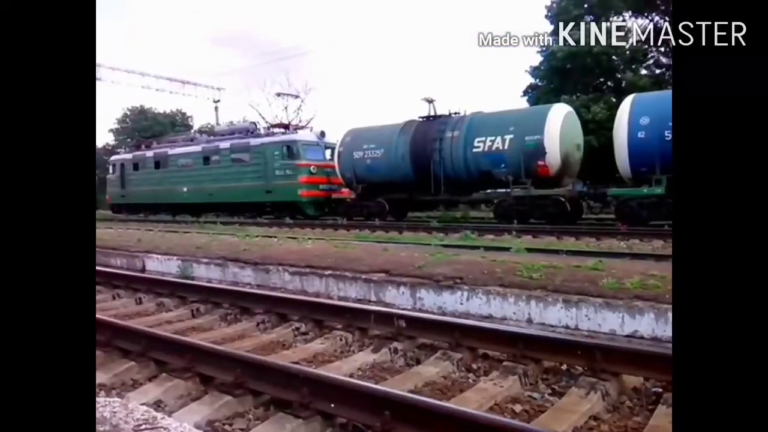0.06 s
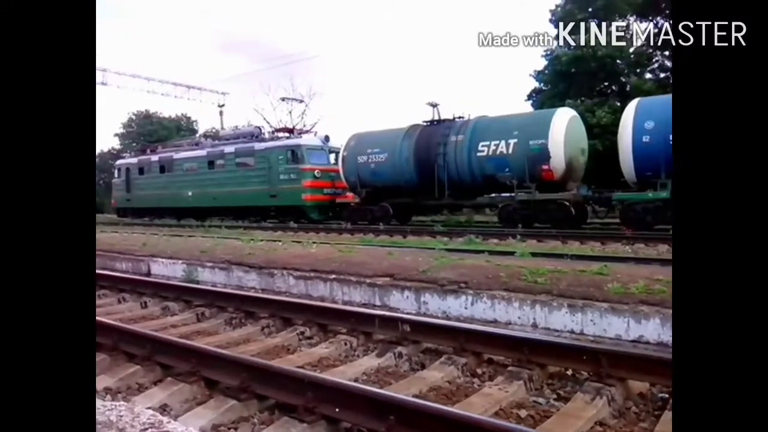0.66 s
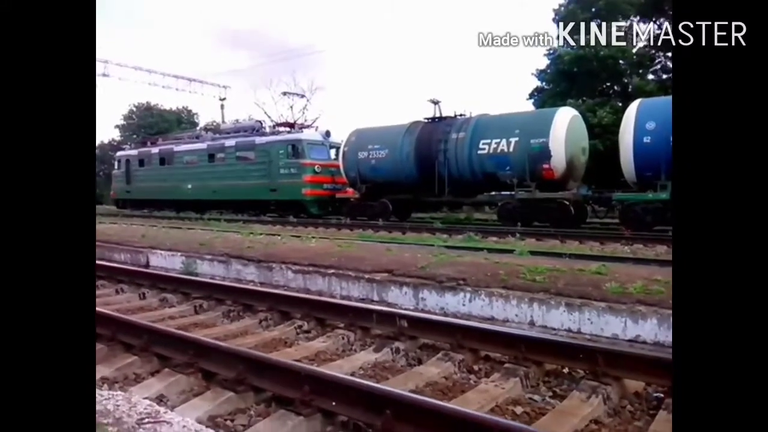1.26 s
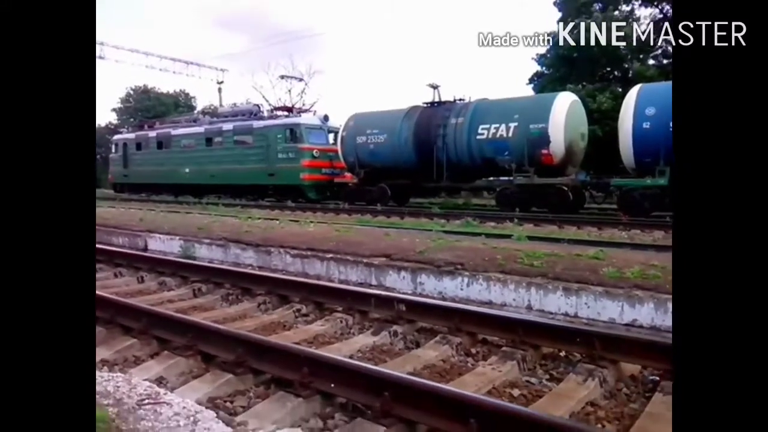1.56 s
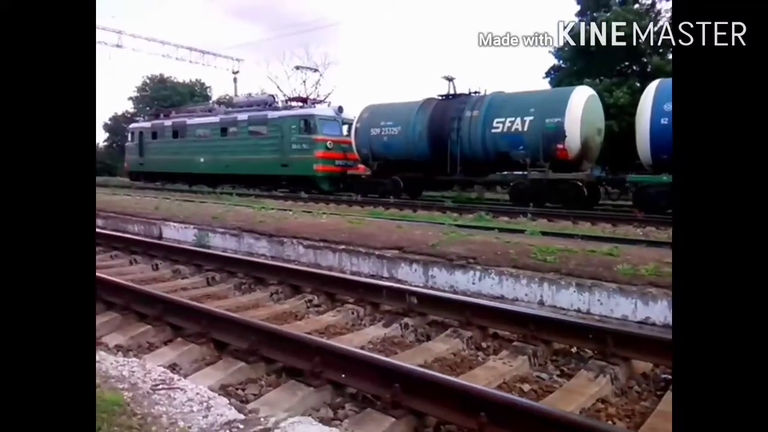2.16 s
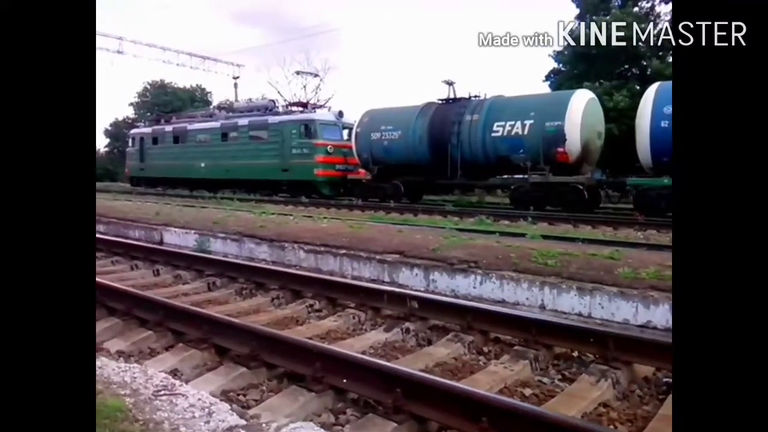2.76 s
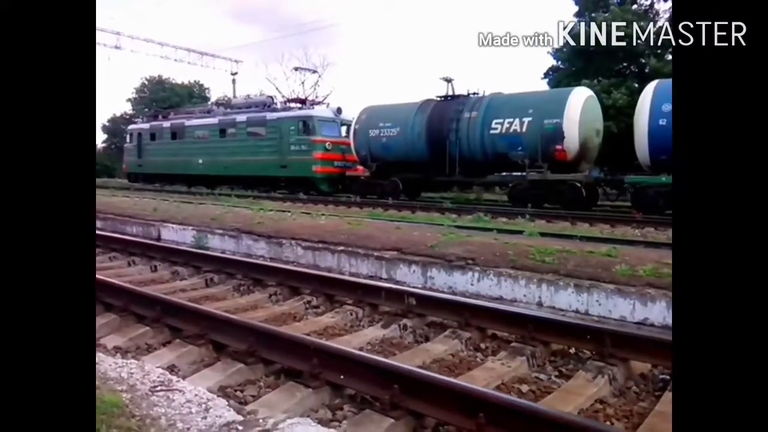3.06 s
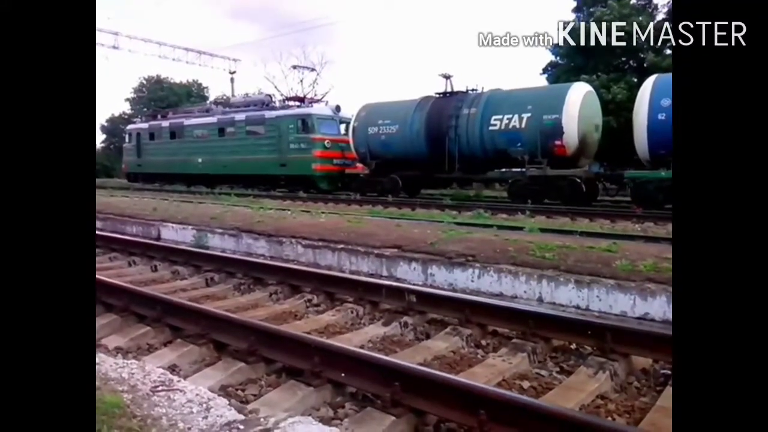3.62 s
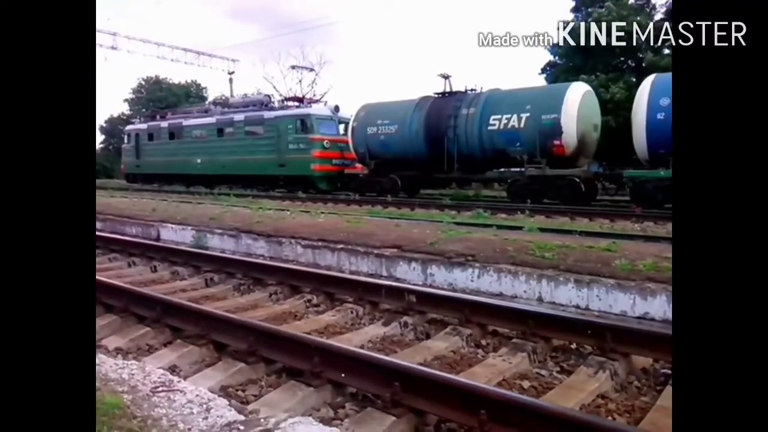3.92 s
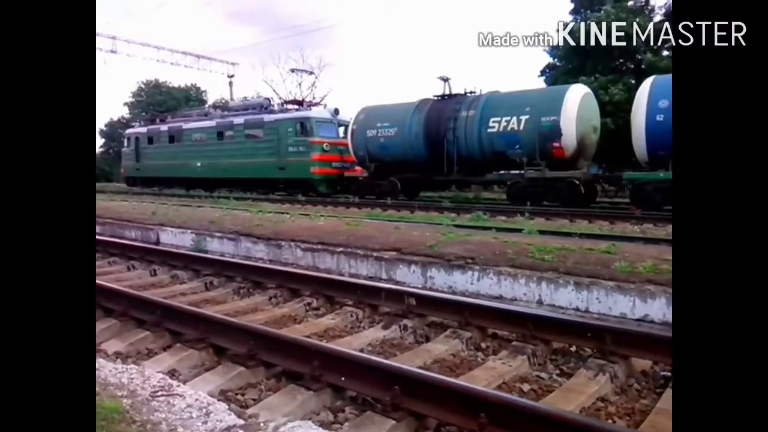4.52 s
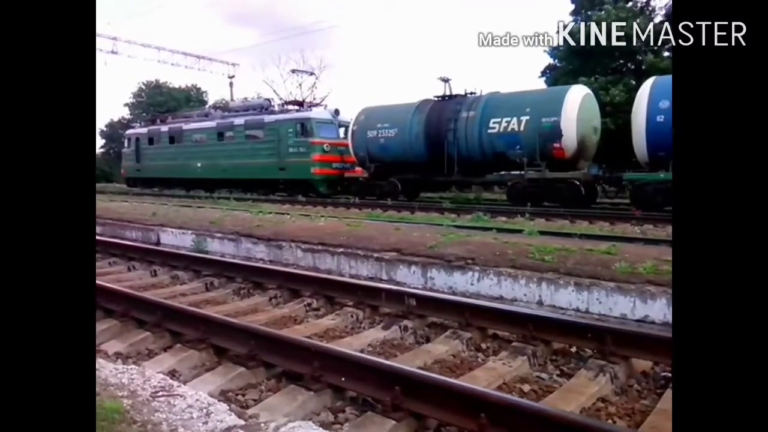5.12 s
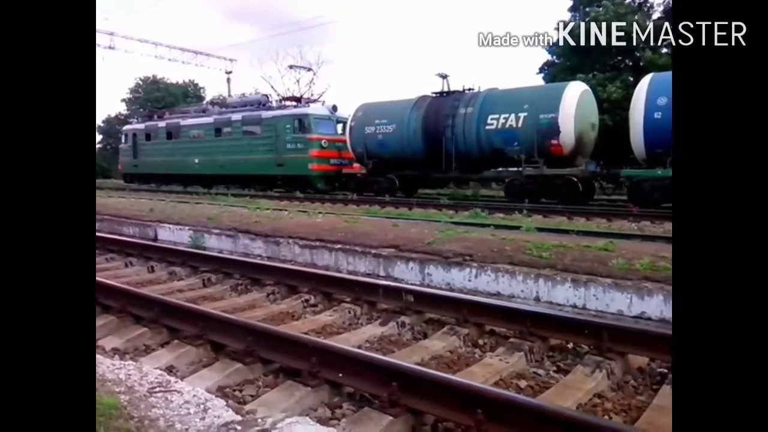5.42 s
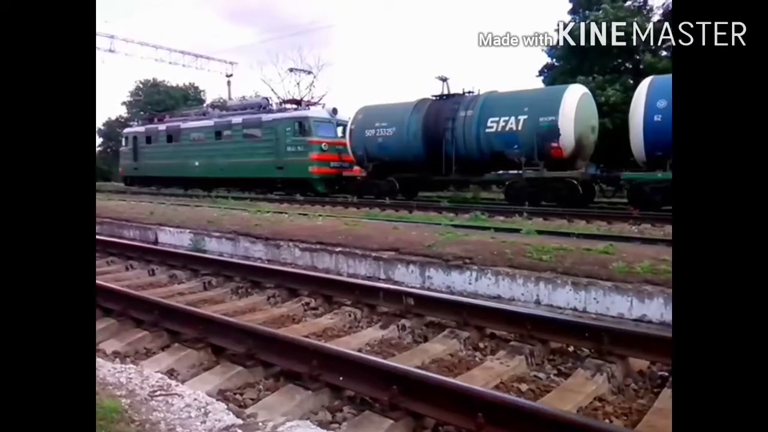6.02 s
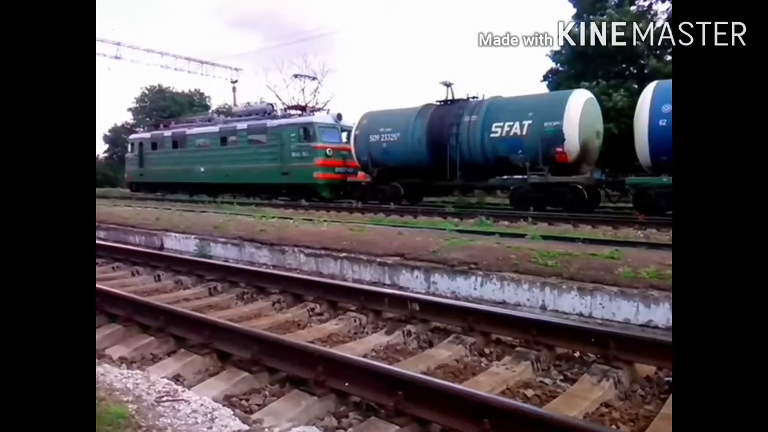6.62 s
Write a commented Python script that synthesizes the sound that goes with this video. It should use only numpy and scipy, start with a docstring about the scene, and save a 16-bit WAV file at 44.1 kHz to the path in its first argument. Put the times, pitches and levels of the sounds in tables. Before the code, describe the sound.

A short blast of released air dies away as an electric locomotive stands in a rail yard. A thin, high, sizzling motor whine rises slightly in pitch, then swells and fades over rushing cooling air, a soft compressor throb, light metallic chatter and a continuous hiss. Faint squeaks and groans come from the machinery. Wind hits the bare microphone in irregular low thumps and a few sharp slaps.

```python
"""A blast of released air dies away as an electric locomotive, standing in a rail yard, spins a motor
up to a thin, sizzling whine. Cooling air churns through the louvres, a compressor's two pistons throb
in their intake pipe, and the machine room chatters, with faint groans and squeaks. A thin hiss of air
carries on throughout, while eddies of wind thump and slap on the bare microphone."""
import sys
import numpy as np
from scipy import signal
from scipy.fft import rfft, irfft
from scipy.io import wavfile
from scipy.ndimage import uniform_filter1d, map_coordinates

SR = 44100
rng = np.random.default_rng(int(sys.argv[2]) if len(sys.argv) > 2 else 0)


def transcribe(u):
    """Save the signal u as a 16-bit wav file named by the first command-line argument.

    u: samples, shape (n,) or (channels, n), limited to [-1, 1]; the rate is SR.
    q: integer samples, one column per channel.
    """
    v = np.clip(np.atleast_2d(u).T, -1, 1)
    q = np.round(v * 32767).astype(np.int16)
    wavfile.write(sys.argv[1], SR, q)


N = 298998
TIME = np.arange(N) / SR
BINS = np.fft.rfftfreq(N, 1 / SR)


# Bright colour of the released air: freq_hz, gain_db
BLAST_EQ = [(200, -52), (550, -16.5), (750, -6.5), (1250, -2.5), (1900, 0.5), (2400, -5.5), (2750, -2),
            (3300, -13), (4300, -13), (5300, 3), (6100, -1), (7300, -8), (8000, -42.5), (8550, -32),
            (9300, -51.5)]
def air_blast(level_db=-19, shut_s=.16, fall_db_per_s=60):
    """A valve blows off air, then shuts, and the blast dies away."""
    return amp(level_db - fall_db_per_s * np.maximum(TIME - shut_s, 0)) * noise(BLAST_EQ)


# Fader ride of the whine: time_s, level_db
WHINE_RIDE = [(.38, -27.5), (.59, -48), (.76, -30), (.95, -23), (1.21, -28), (1.34, -36), (1.64, -35),
              (2.25, -41.5), (2.46, -48), (3.2, -27.5), (3.85, -41.5), (4.29, -45.5), (4.51, -32.5),
              (4.64, -42), (4.75, -30), (5.35, -34.5), (5.85, -45.5), (6.78, -44)]
# Resonances that sizzle around the whine: pitch_hz, width_hz, gain_db
SIZZLE_MODES = [(4925, 85, 4), (5058, 91, 3), (5230, 250, 4), (5540, 420, 6.5)]
def motor(full_hz=5265, climb_hz=155, spin_up_s=.7, jitter_hz=3, fade_in_s=.41, whine_share=.47):
    """The motor whines up to full speed; its sizzle follows both the whine and the hiss of air."""
    pitch_hz = full_hz - climb_hz * np.exp(-TIME / spin_up_s) + jitter_hz * drift(21)
    phase = 2 * np.pi * np.cumsum(pitch_hz) / SR
    # scattered paths add to the direct one with shifting strength and phase
    tone = unit((1 + .3 * drift(60)) * np.sin(phase) + .3 * drift(60) * np.cos(phase))
    whine_gain = level(WHINE_RIDE) * np.minimum(TIME / fade_in_s, 1) ** 2
    sizzle_gain = whine_gain ** whine_share * level(HISS_RIDE) ** (1 - whine_share)
    return amp(2) * whine_gain * tone + sizzle_gain * ringing(SIZZLE_MODES)


# Broad colour of air through the louvres: freq_hz, gain_db
LOUVRE_EQ = [(20, -56.5), (55, -35.5), (95, -3), (200, -1), (380, -6), (600, -8), (730, -2), (900, -8.5),
             (1100, -0.5), (1600, -0.5), (2150, -0.5), (2300, -5.5), (2850, -3.5), (3200, -23), (4200, -38),
             (5500, -28), (9000, -46)]
# Fader ride of the cooling air: time_s, level_db
COOLING_RIDE = [(0, -37.5), (0.58, -36), (2.81, -38), (3.57, -35), (5.17, -39.5), (5.8, -39), (6.78, -37.5)]
# Resonances of the machine room: pitch_hz, width_hz, gain_db
ROOM_MODES = [(1085, 17, -7), (1322, 64, -5), (1535, 51, -1.5), (1625, 22, -6.5), (1735, 75, -1),
              (2026, 25, -6), (2149, 38, -2)]
def cooling_air(rush_db=.5, room_db=-2, churn_db=3.5):
    """Fan air rushes through the louvres and stirs the room's resonances, each in its own surges."""
    room = unit(sum(amp(db + churn_db * drift(19)) * ringing([(hz, width, 0)])
                    for hz, width, db in ROOM_MODES))
    rush = amp(rush_db) * noise(LOUVRE_EQ)
    churn = amp(room_db) * wobble(room, depth=.003, rate_hz=7.83)
    return level(COOLING_RIDE) * (rush + churn)


def compressor(pipe_hz=278.5, turn_s=.283, first_stroke_s=.235, sharpness=4.5):
    """Two pistons, one strong and one weak, take turns at sounding the intake pipe."""
    crank = np.cos(2 * np.pi * (TIME - first_stroke_s) / turn_s)
    strong = np.exp(sharpness * (crank - 1))
    weak = amp(-10) * np.exp(-sharpness * (crank + 1))
    pipe = unit(np.sin(2 * np.pi * (pipe_hz * TIME + .094 * drift(14))))
    uneven_gain = amp(-38 + 2 * drift(6))
    return uneven_gain * (strong + weak + amp(-17)) * pipe  # the pipe hums on between strokes


# Fader ride of the hiss: time_s, level_db
HISS_RIDE = [(0.4, -39), (1.0, -36.5), (1.5, -42), (2.35, -35), (2.58, -40.5), (3.3, -34), (5.2, -46.5),
             (6.78, -40.5)]
# Thin colour of the hiss: freq_hz, gain_db
HISS_EQ = [(3000, -7), (4200, -7.5), (4600, 1), (5300, 0), (5800, 3.5), (6300, 1.5), (6750, 2),
           (7300, -0.5), (7650, -22.5), (8000, -44), (8600, -23.5), (9200, -39.5)]
def air_hiss(trim_db=1.03, flutter_db=.7):
    """Air hisses on with a slight flutter."""
    return amp(trim_db + flutter_db * drift(12)) * level(HISS_RIDE) * noise(HISS_EQ)


# Swell of the spurt: peak_s, level_db, half_length_s
SPURT_SWELL = [(3.245, -32, -0.01)]
# Resonance of the spurt: pitch_hz, width_hz, gain_db
SPURT_MODE = [(6620, 630, 0)]
def air_spurt():
    """One short, high spurt of air."""
    return swells(SPURT_SWELL) * ringing(SPURT_MODE)


# Close, metallic resonances: pitch_hz, width_hz, gain_db
CHATTER_MODES = [(1860, 71, 2.5), (1922, 42, 3.5), (2040, 100, -7)]
# Accents in the rattle: peak_s, level_db
CHATTER_ACCENTS = [(.28, -24.5), (.47, -32.5), (2.41, -32.5), (3.061, -27), (3.29, -28), (6.64, -32)]
def chatter(idle_db=-41.5, uneven_db=4.5, half_length_s=.051):
    """A restless rattle, with a few harder bursts, stirs resonances that bend in pitch."""
    rattle = amp(idle_db + uneven_db * np.tanh(drift(11)))
    bursts = amp(-2) * swells([(s, db, half_length_s) for s, db in CHATTER_ACCENTS])
    return np.hypot(rattle, bursts) * wobble(ringing(CHATTER_MODES), depth=.0051, rate_hz=10.26)


# Single strong eddies: peak_s, level_db, half_length_s
WIND_THUMPS = [(1.002, -18.5, 0.0074), (1.075, -22.5, .025), (1.342, -12.5, 0.013), (1.597, -12.5, 0.0062),
               (1.634, -15, .015), (1.975, -13, .026), (2.126, -19, 0.024), (2.248, -29, 0.012),
               (2.406, -16.5, 0.0067), (2.491, -18, 0.029), (2.529, -7.5, 0.0084), (2.665, -15, 0.0092),
               (2.847, -15, 0.011), (3.007, -21, 0.0078), (3.083, -21.5, .019), (3.262, -19, .031),
               (3.303, -16, 0.031), (3.566, -30, 0.013), (4.348, -17.5, 0.022), (4.85, -11.5, 0.017),
               (5.052, -12.5, .022), (5.55, -21, .02), (5.902, -19.5, 0.014), (6.123, -19.5, 0.021),
               (6.213, -22, 0.0078), (6.294, -17.5, 0.013), (6.751, -16.5, 0.014)]
# Dull colour of soft wind: freq_hz, gain_db
SOFT_WIND_EQ = [(20, -19), (60, -27), (85, -8), (120, 2.5), (165, 3.5), (280, -3), (400, -21.5),
                (560, -43.5), (900, -50.5), (2000, -88.5)]
# Brighter colour of hard wind: freq_hz, gain_db
HARD_WIND_EQ = [(20, -22), (60, -23), (85, -16.5), (120, -4.5), (165, 4), (280, -2.5), (400, -8.5),
                (520, -12.5), (750, -26), (1100, -40), (2500, -86)]
def wind(soft_db=-26, hard_db=-13, lumps_db=10):
    """Each eddy pushes a few uneven cycles of pressure into the microphone; harder ones are brighter."""
    force = np.hypot(gusts(), swells(WIND_THUMPS, lean=.07))
    hardness = np.clip((20 * np.log10(force) - soft_db) / (hard_db - soft_db), 0, 1)
    # turbulence comes in lumps, so the thumps sputter
    swirl = rng.standard_normal(N) * amp(lumps_db * np.tanh(drift(110)))
    pressure = (1 - hardness) * colour(swirl, SOFT_WIND_EQ) + hardness * colour(swirl, HARD_WIND_EQ)
    # compress the swirl, so the eddy sets how hard the thump is
    local_rms = np.sqrt(uniform_filter1d(uniform_filter1d(pressure ** 2, size=750), size=500))
    return amp(.5) * force * unit(pressure / local_rms ** .85)


# Gusts, each a crowd of small eddies: start_s, length_s, level_db, uneven_db
GUST_CUES = [(0.655, 0.047, -29, 3), (0.879, 0.23, -34, 5.5), (1.217, 0.12, -29, 4.5),
             (1.555, 0.15, -17.5, 4), (1.734, .17, -24, 3), (1.94, .92, -28, 3), (4.72, 0.22, -18.5, 1.5),
             (4.83, 0.39, -14, -1), (5.505, .65, -35.5, 6)]
def gusts(rise_s=.014, fall_s=.028, eddy_hz=24.6):
    """Gain of gusts that rise, hold and fall away, while their small eddies come at random."""
    eddies = np.clip(drift(eddy_hz), -2, 1.5)
    power = np.zeros(N)
    for start, length, db, uneven_db in GUST_CUES:
        before = np.maximum(start - TIME, 0) / rise_s
        after = np.maximum(TIME - start - length, 0) / fall_s
        power += (amp(db + uneven_db * eddies) * np.exp(-before - after)) ** 2
    return np.sqrt(power)


# Slaps of the sharpest eddies: centre_s, level_db, pitch_hz, half_length_cycles
SLAP_HITS = [(1.331, -1.5, 366, 0.65), (1.639, -6.5, 792, 1.2), (2.531, -20, 316, 0.38),
             (6.114, -16, 450, 1.4)]
def wind_slaps():
    """A sharp eddy is a quick push and pull on the diaphragm."""
    out = np.zeros(N)
    for s, db, hz, half_length in SLAP_HITS:
        cycles = (TIME - s) * hz
        out -= amp(db) * np.sin(2 * np.pi * cycles) * np.exp(-(cycles / half_length) ** 2)
    return out


# Faint metallic squeaks: peak_s, level_db
SQUEAK_CUES = [(0.64, -38.5), (2.791, -39.5), (2.94, -44), (3.38, -39.5)]
def squeaks(pitch_hz=2705, width_hz=70, half_length_s=.032):
    """A narrow resonance sings out briefly now and then."""
    return swells([(s, db, half_length_s) for s, db in SQUEAK_CUES]) * ringing([(pitch_hz, width_hz, 0)])


# Faint groans: peak_s, level_db, half_length_s
GROAN_CUES = [(3.89, -49, .03), (4.23, -42, .055), (4.49, -46, .025)]
# Hollow body of the groans: pitch_hz, width_hz, gain_db
GROAN_MODES = [(720, 57, -4), (760, 130, 14.5)]
def groans():
    """A hollow resonance swells now and then."""
    return swells(GROAN_CUES) * ringing(GROAN_MODES)


def yard_echoes(x, count=8, gain=.17, latest_s=.03):
    """Echoes off the ground and the wagons comb the noise with fine ripples."""
    delays = (rng.uniform(.1, 1, count) * latest_s * SR).astype(int)
    echoes = sum(np.pad(x, (delay, 0))[:N] for delay in delays)
    return (x + gain * echoes) / np.sqrt(1 + count * gain ** 2)


def amp(db):
    """Decibels to gain."""
    return 10 ** (np.asarray(db) / 20)


def unit(x):
    """Scales to rms 1."""
    return x / np.sqrt(np.mean(x ** 2) + 1e-20)


def level(ride):
    """Gain at every sample of a fader ride."""
    return amp(np.interp(TIME, *np.transpose(ride)))


def colour(x, eq):
    """Filters x by an EQ curve drawn on a log-frequency axis; rms 1."""
    hz, db = np.transpose(eq)
    gain = amp(np.interp(np.log(BINS + 1), np.log(hz), db))
    return unit(irfft(rfft(x) * gain, N))


def noise(eq):
    """Noise of a given colour."""
    return colour(rng.standard_normal(N), eq)


def drift(rate_hz):
    """Slow random motion of rms 1."""
    lowpass = np.exp(-(BINS / rate_hz) ** 2) * (BINS > 0)
    return unit(irfft(rfft(rng.standard_normal(N)) * lowpass, N))


def ringing(modes):
    """Resonances stirred by turbulence, each with steep skirts; rms 1."""
    power = sum(amp(db) ** 2 / width / (1 + (2 * (BINS - hz) / width) ** 2) ** 2
                for hz, width, db in modes)
    return unit(irfft(rfft(rng.standard_normal(N)) * np.sqrt(power), N))


def swells(cues, lean=0):
    """Gain of rounded bursts; lean makes the rise quicker than the fall."""
    peak_s, db, half_length_s = np.transpose(cues)
    t = TIME[::32, None]
    age = (t - peak_s) / half_length_s
    age *= 1 - lean * np.sign(age)
    power = (amp(db) ** 2 / (1 + age ** 2 / 2) ** 3).sum(axis=1)
    return np.interp(TIME, t[:, 0], np.sqrt(power))


def wobble(x, depth, rate_hz):
    """Bends all pitches of x up and down by a small random share."""
    playhead = np.arange(N) + np.cumsum(depth * drift(rate_hz))
    return map_coordinates(x, [playhead], order=3, mode="mirror")


def scene():
    """The locomotive across the tracks, and the wind at the microphone, in mono."""
    machinery = compressor() + motor() + chatter() + groans() + squeaks() + cooling_air()
    escaping_air = yard_echoes(air_hiss() + air_blast() + air_spurt())
    return (machinery + escaping_air + wind() + wind_slaps())[None]


def record(dry, ceiling=.95, cutoff_hz=9100):
    """A soft clip rounds off the largest thumps; a steep low-pass trims the top."""
    rounded = dry / (1 + (dry / ceiling) ** 8) ** (1 / 8)
    lowpass = signal.firwin(511, cutoff_hz, window=("kaiser", 9), fs=SR)
    return signal.oaconvolve(rounded, lowpass[None], "same")


dry = scene()
out = record(dry)
transcribe(out)
```